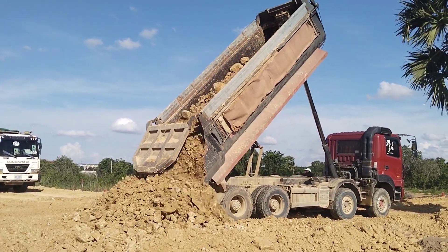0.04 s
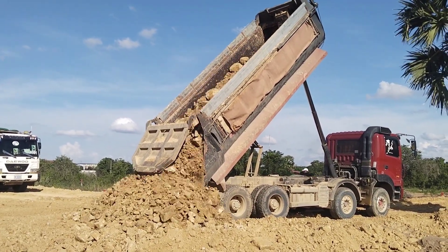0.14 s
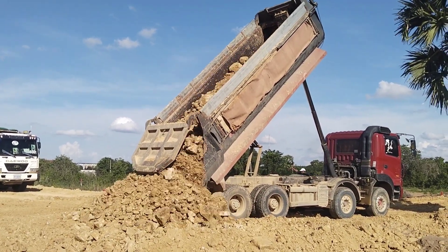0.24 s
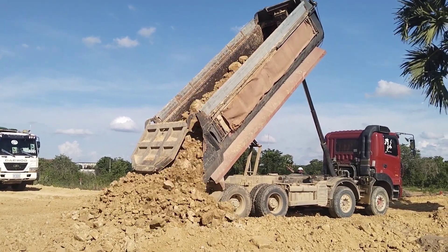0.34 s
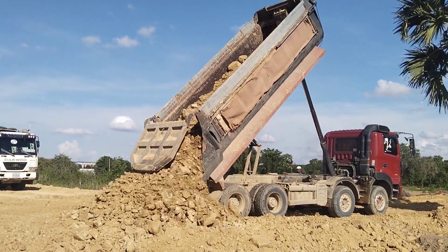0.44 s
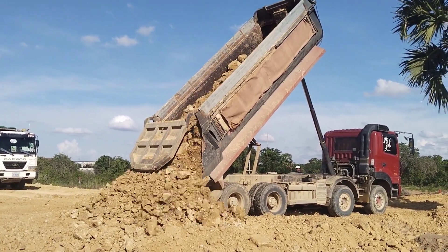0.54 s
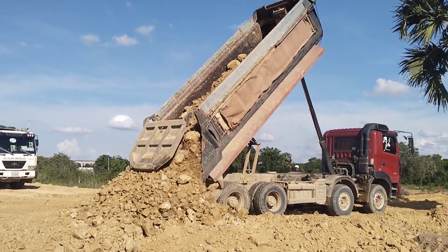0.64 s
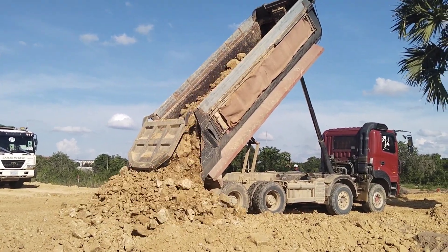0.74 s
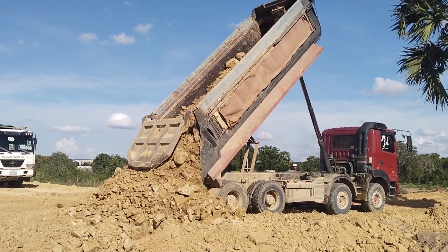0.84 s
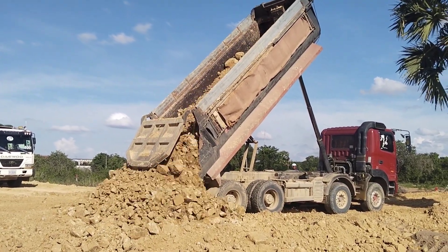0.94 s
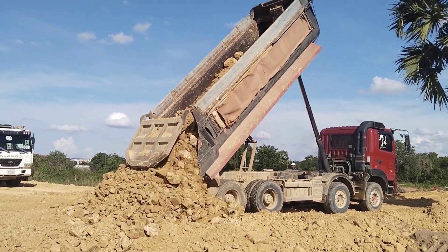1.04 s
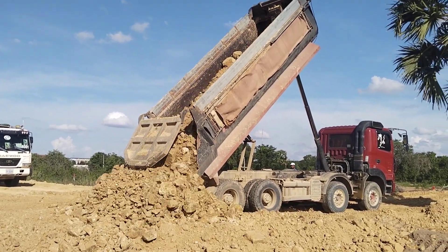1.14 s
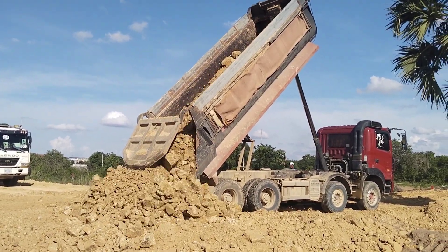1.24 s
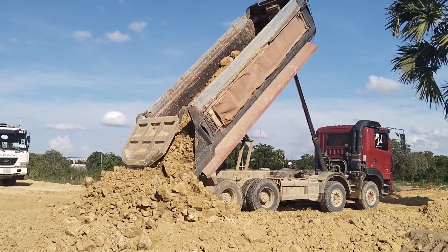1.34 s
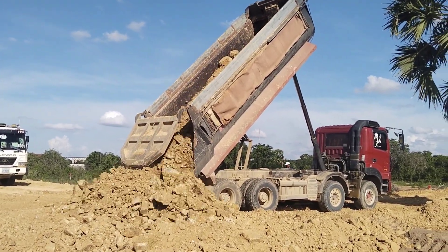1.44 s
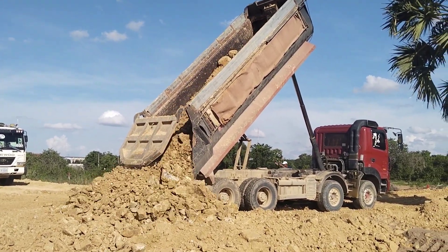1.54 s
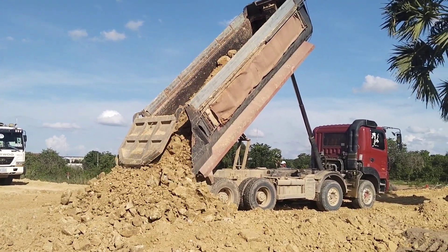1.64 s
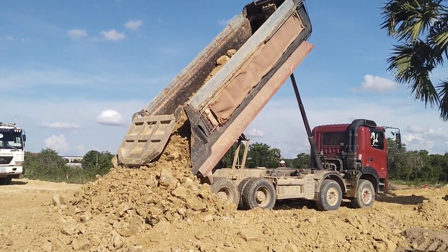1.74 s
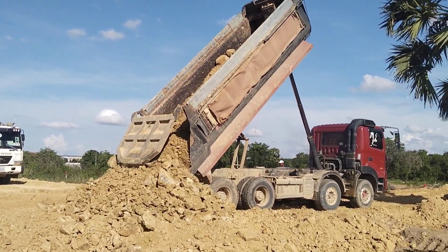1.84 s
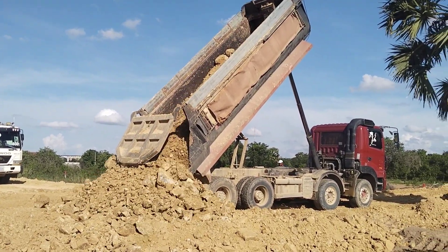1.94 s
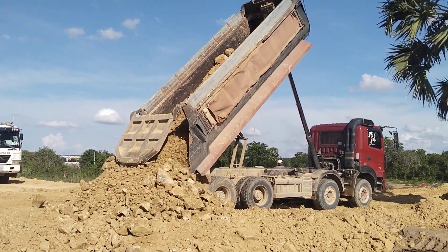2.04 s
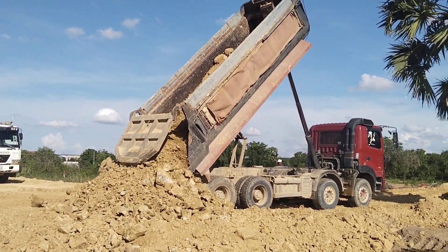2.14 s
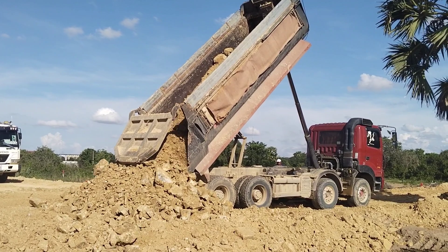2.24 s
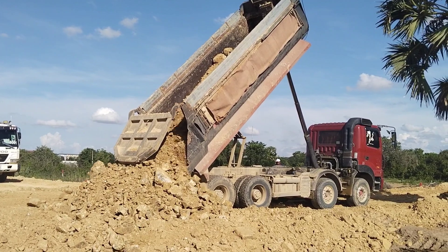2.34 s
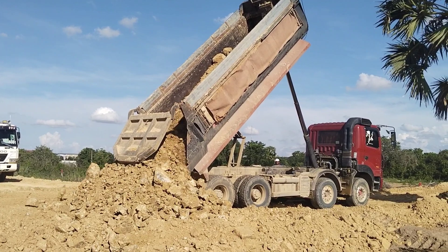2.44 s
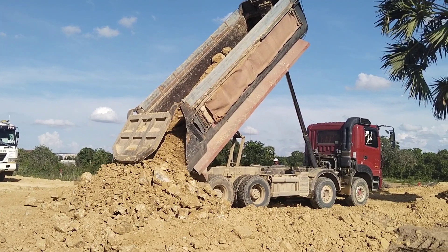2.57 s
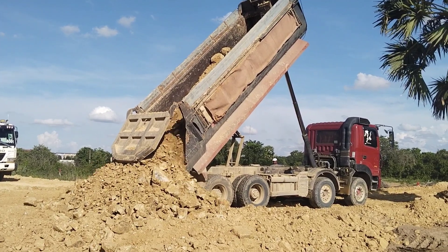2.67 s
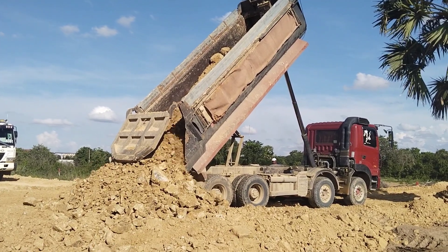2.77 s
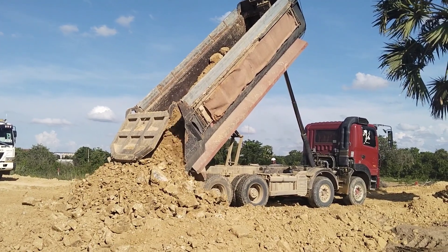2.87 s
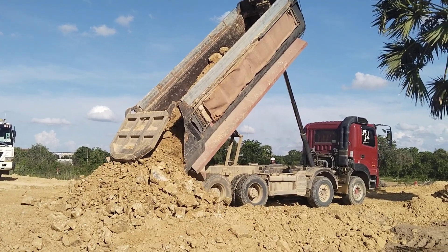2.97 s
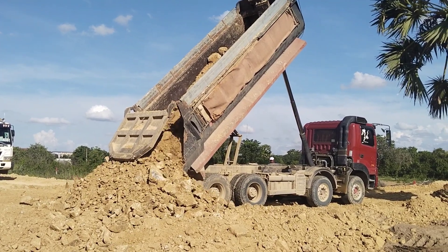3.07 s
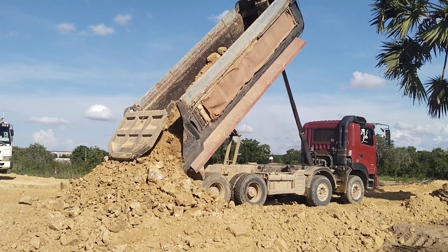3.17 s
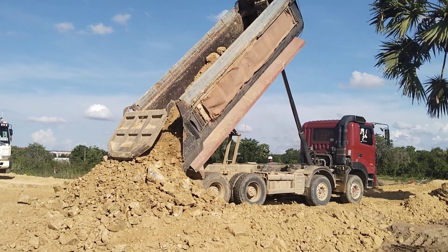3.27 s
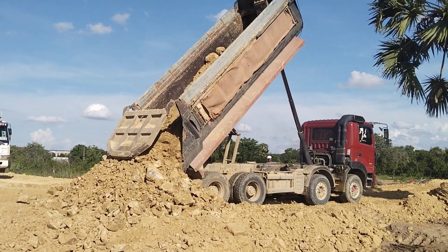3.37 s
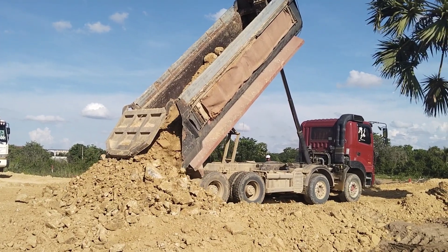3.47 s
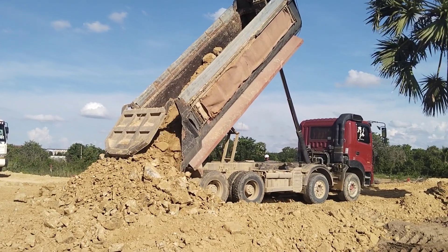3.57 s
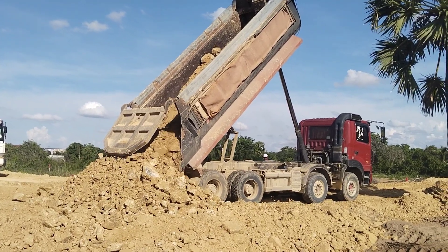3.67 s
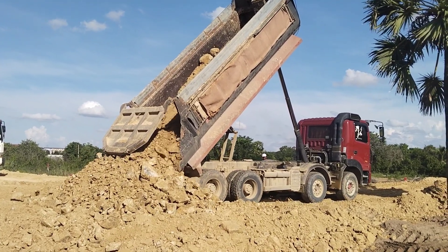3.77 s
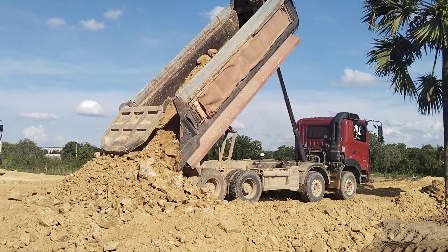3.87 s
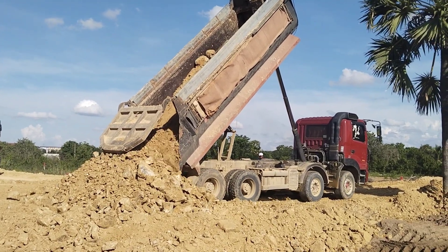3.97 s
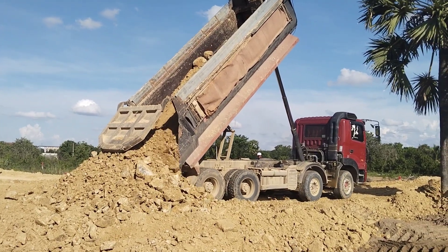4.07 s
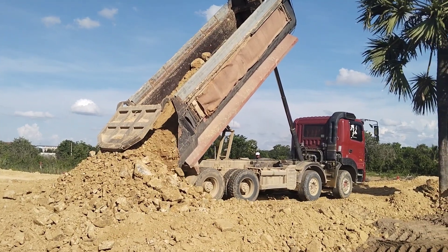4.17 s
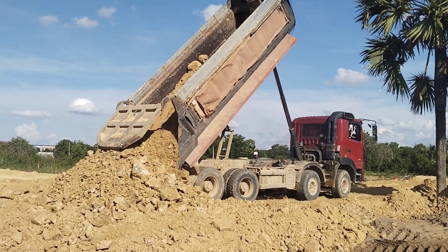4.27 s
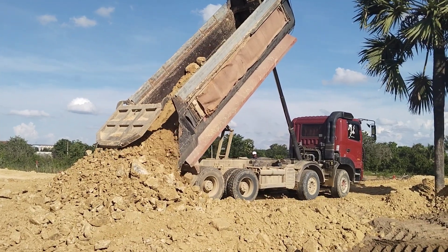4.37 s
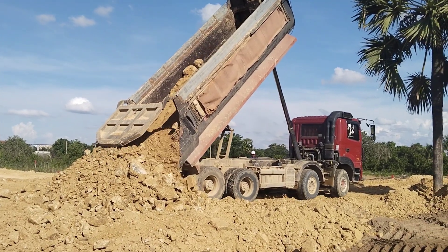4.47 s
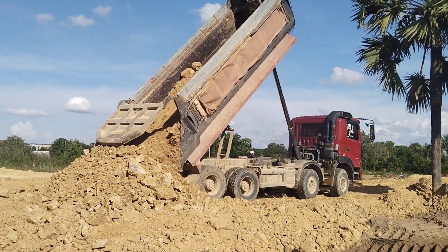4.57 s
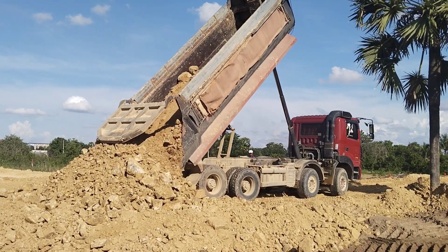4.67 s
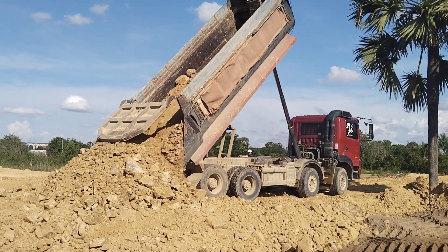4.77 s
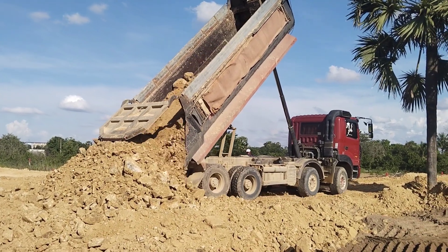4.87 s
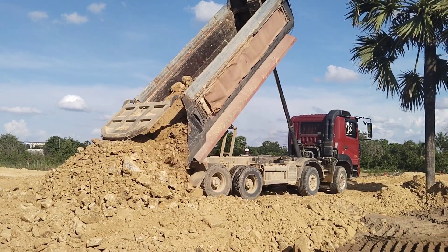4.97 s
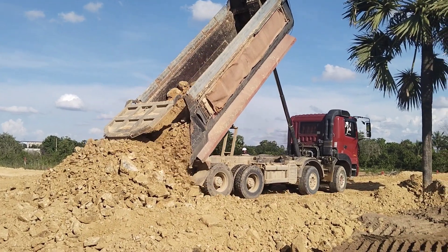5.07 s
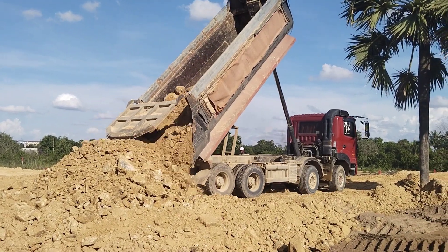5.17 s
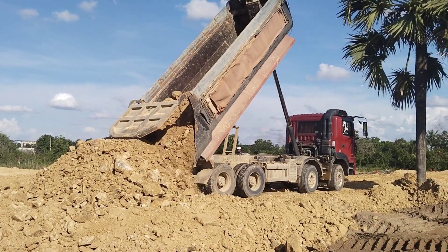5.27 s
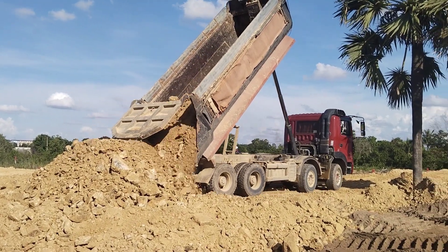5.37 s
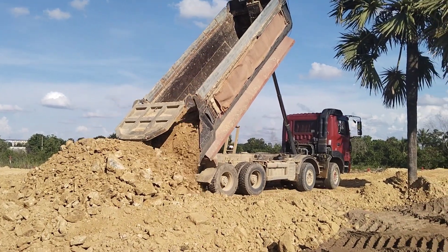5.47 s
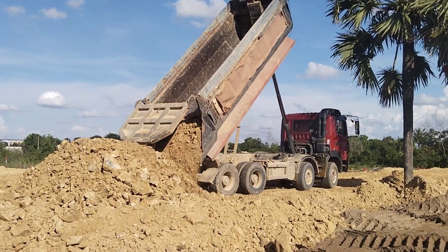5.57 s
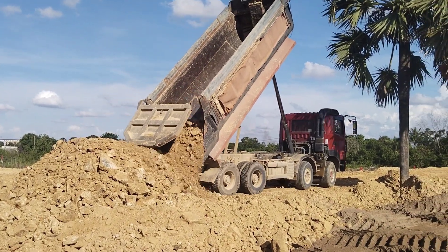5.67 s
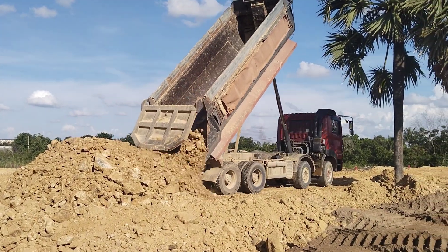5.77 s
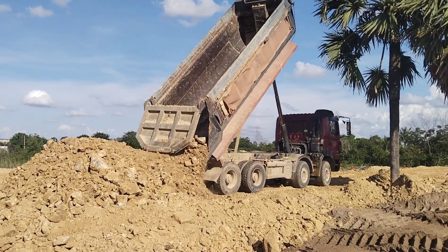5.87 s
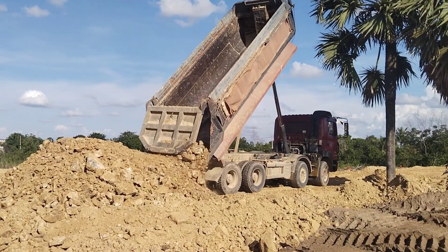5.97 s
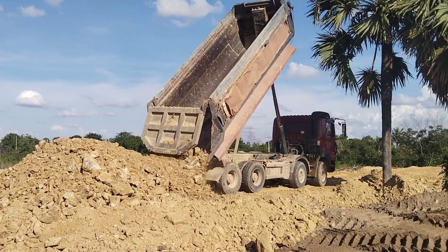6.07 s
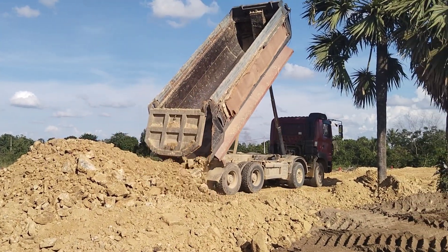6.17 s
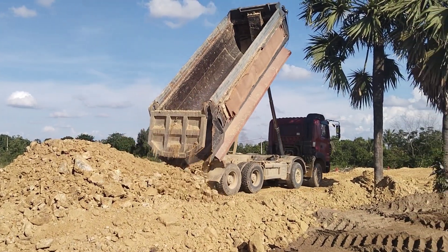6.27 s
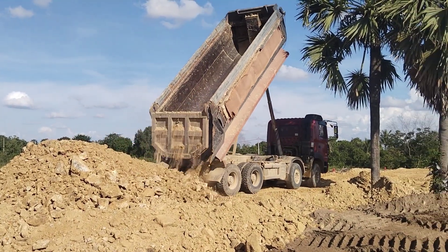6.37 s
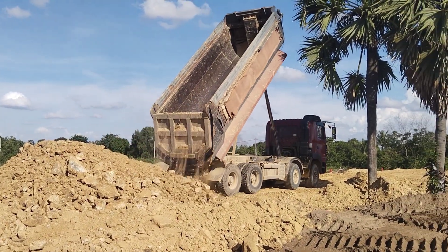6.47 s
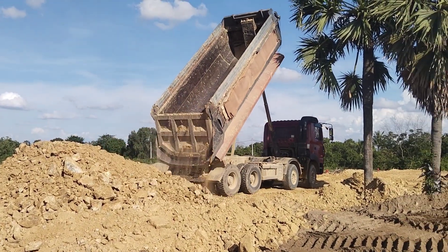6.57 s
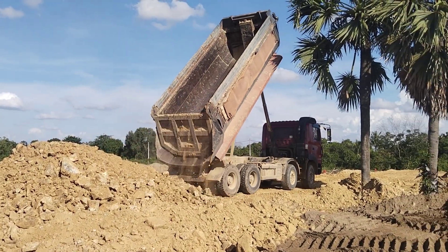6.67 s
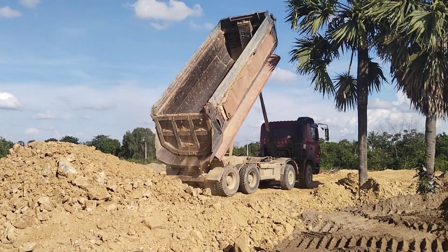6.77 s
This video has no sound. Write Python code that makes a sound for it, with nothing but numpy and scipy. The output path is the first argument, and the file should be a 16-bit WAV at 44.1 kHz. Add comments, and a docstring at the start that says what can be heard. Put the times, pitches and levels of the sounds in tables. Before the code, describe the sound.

A tipper truck empties rocky fill: early dull thuds and clangs, scattered stone clacks, a few thin high metal squeals, a sharp air release with a trailing leak and a smaller puff. The diesel speeds up, gravel and lumps pour down the steel, then the gate bangs loudly several times. Open-air stereo, faint distant site noise behind.

```python
"""Tipper truck dumping stony fill

Heard on an open site, in stereo: lumps thud and clang on the raised steel bed as filtered flurries of contacts,
stones clack on the heap to the left as wavering notes, and filtered noise makes two air-brake blasts and a leak.
The firing pulses of the diesel speed up, then the rest of the load slides out as showers of grains and the
tailgate slams. Thin gliding squeals come and go above it, over a faint bed of distant site noise."""
import sys
import numpy as np
from scipy import signal
from scipy.fft import rfft, irfft, next_fast_len
from scipy.io import wavfile
from scipy.ndimage import map_coordinates

SR = 44100
rng = np.random.default_rng(int(sys.argv[2]) if len(sys.argv) > 2 else 0)


def output_pcm(signal):
    """Save a mono or channel-first signal as 16-bit PCM at the path in sys.argv[1].

    Samples are clipped to [-1, 1] before scaling.
    """
    pcm = np.clip(np.atleast_2d(signal).T, -1, 1) * 32767
    wavfile.write(sys.argv[1], SR, np.round(pcm).astype(np.int16))


N = 300762

T = np.arange(N) / SR  # time [s]
SIZE = next_fast_len(N + SR // 2)  # transform length, with room for tails
HZ = np.maximum(np.arange(SIZE // 2 + 1) * SR / SIZE, 1)  # frequency of each bin [Hz]
TOP_HZ = 15750  # the microphone hears nothing much above this
MID_ONLY = np.array([[1], [0]])  # places a sound in mid, with no side


def undb(db):
    """Decibels to gain."""
    return 10 ** (np.asarray(db) / 20)


def unit(x):
    """Scale to rms 1."""
    return x / np.sqrt(np.mean(x ** 2) + 1e-18)


def curves(rows):
    """Each column of a time table, interpolated sample by sample."""
    s, *columns = np.transpose(rows)
    return [np.interp(T, s, column) for column in columns]


def colour(points):
    """Frequency response through (frequency [Hz], level [dB]) points."""
    hz, db = np.transpose(points)
    return undb(np.interp(np.log(HZ), np.log(hz), db))


def resonances(modes):
    """Frequency response of damped modes of alternating sign."""
    response = 0
    for k, (hz, width, db) in enumerate(modes):
        detuning = (HZ ** 2 - hz ** 2) / (HZ * width)
        response = response + (-1) ** k * undb(db) / (1 + 1j * detuning)
    return response


def peaks(modes):
    """Steep-sided resonances with dark valleys between them."""
    return sum(undb(db) / (1 + ((HZ ** 2 - hz ** 2) / (HZ * width)) ** 2) for hz, width, db in modes)


def band(low_hz, high_hz):
    """Frequency response with steep skirts below and above."""
    return 1 / np.sqrt((1 + (low_hz / HZ) ** 8) * (1 + (HZ / high_hz) ** 8))


def through(x, response):
    """Filter x; white input keeps its power, so only the shape of the response matters."""
    power = np.mean(abs(response) ** 2)
    return irfft(rfft(x, SIZE) * response / np.sqrt(power), SIZE)[..., :N]


def noise():
    """Unrelated white noise for mid and side."""
    return rng.standard_normal((2, N))


def walk(rate):
    """Random drift in straight segments, rate new values a second, spread near 1."""
    return np.interp(T * rate, np.arange(8192), rng.standard_normal(8192))


def grains(rate, scatter_db):
    """Stone contacts of uneven size, rate a second, simultaneous in mid and side but of unrelated sign."""
    spread = np.clip(rng.standard_normal(N), -2, 2)
    sizes = (rng.random(N) < rate / SR) * undb(scatter_db * spread)
    return unit(sizes * np.sign(noise()))


def burst(t, rise, fade, hold=0):
    """Envelope that climbs from t = 0, holds and dies away."""
    return np.clip(t / rise, 0, 1) * np.exp(-np.clip((t - rise - hold) / fade, 0, 20))


def after(s):
    """The half second after s: its samples and their times from zero."""
    span = slice(int(s * SR), int(s * SR) + SR // 2)
    return span, T[:len(T[span])]


def mottle(x, depth_db, rate, per_octave=7):
    """Neighbouring bands of x swell and sink independently, about rate times a second."""
    hz, s, cells = signal.stft(x, SR, nperseg=1024)
    place = np.meshgrid(per_octave * np.log2(1 + hz / 400), s * rate, indexing="ij")
    drift = map_coordinates(rng.standard_normal((192, 256)), place, order=1, mode="mirror")
    return signal.istft(cells * unit(undb(depth_db * drift)), SR)[1][..., :N]


# spectrum of the distant site: (frequency [Hz], relative level [dB])
SITE = [(18, -53), (30, -37), (86, -2.5), (244, 2), (565, -12.5), (929, 1), (1180, -62), (1940, -14),
        (3730, -9.5), (6290, -21), (9570, -15.5), (10600, -21), (12100, -14.5), (13500, -20), (15800, -28)]


def site():
    """Far machines and moving air: noise that gently swells and wanders in colour."""
    swell_db = 1.0 * walk(6)
    air = through(noise() * undb(-55.0 + swell_db), colour(SITE))
    return mottle(mottle(air, 3, rate=14, per_octave=16), 2.5, rate=4, per_octave=5)


# the diesel: (time [s], firing rate [Hz], exhaust level [dB])
DIESEL = [(0, 38.43, -65.5), (3.6, 37.72, -64.5), (4.1, 50.08, -57), (4.5, 55.52, -61), (5.4, 58.16, -72),
          (5.8, 51.7, -38.5), (6.2, 43.87, -52.5), (6.82, 40.2, -40.5)]
# resonances of the engine block: (frequency [Hz], width [Hz], relative level [dB])
BLOCK = [(830, 330, -7.5), (1577, 230, 7.5), (2458, 156, 4.5), (2896, 130, -2), (3150, 150, -6),
         (4210, 140, 0), (4900, 200, -7), (5700, 350, -11), (6380, 420, -10.5)]
IDLE_KNOCK_DB, KNOCK_DB_PER_HZ = -65, 0.9983  # combustion knock grows with speed
KNOCK_FLUTTER_DB = 3.5  # the knock swells and sinks irregularly
# a flare of knock as the throttle opens
THROTTLE_S, THROTTLE_DB, THROTTLE_RISE_S, THROTTLE_FADE_S = 3.54, -48, 0.065, 0.13


def diesel():
    """The cylinders fire in turn: a thump in the exhaust and a knock in the block."""
    hz, exhaust_db = curves(DIESEL)
    flare = undb(THROTTLE_DB) * burst(T - THROTTLE_S, THROTTLE_RISE_S, THROTTLE_FADE_S)
    speed_db = KNOCK_DB_PER_HZ * (hz - hz[0])
    effort = undb(IDLE_KNOCK_DB + speed_db + KNOCK_FLUTTER_DB * walk(17)) + flare
    unsteady_hz = hz * (1 + 0.01005 * walk(10) + 0.0376 * walk(50))
    cycles = np.cumsum(unsteady_hz) / SR
    firing = cycles.astype(int)  # number of the current firing
    # alternate firings are stronger and weaker, and each differs a little
    strength = undb((-1) ** firing + rng.standard_normal(firing[-1] + 1)[firing])
    pulses = unit(np.diff(firing, prepend=0) * strength)
    knock = unit(noise() * strength * (np.exp(-(cycles % 1) / .5) + 0.39))
    pipe = resonances([(73.0, 14.0, 2.5), (151, 36, -2.5), (288, 44, -6.5), (425.3, 13.7, 3.5)])
    exhaust = through(pulses * undb(exhaust_db), pipe * band(80, 690))
    clatter = mottle(through(knock * effort, peaks(BLOCK)), 5, rate=13, per_octave=12)
    return exhaust * MID_ONLY + clatter


# the main pour, before its gains below: (time [s], rumble level [dB], gravel hiss level [dB])
SLIDE = [(4.35, -72, -63.5), (4.59, -65, -54), (4.76, -36.5, -49.5), (5.0, -39, -46.5), (5.32, -33, -44.5),
         (5.51, -36, -50), (5.85, -34.5, -54.5), (6.04, -43.5, -59), (6.28, -48.5, -60),
         (6.421, -44.5, -79)]
POUR_RUMBLE_DB, POUR_HISS_DB, POUR_FADE_S = -1.5, 9.5, 0.29  # gains; the pour starts and stops this softly
DRIBBLE_DB, DRIBBLE_HISS_DB = -64, -62  # stones dribble off the bed all the time
SPILL_DB, SPILL_HOLD_S, SPILL_FADE_S = -50, 0.34, 0.53  # an opening spill dies away
SHAKE_DB, SHAKE_RISE_S, SHAKE_FADE_S = -32.5, 0.1, 0.37  # the slam shakes the last stones in the bed


def flow():
    """Strength of rumble and hiss: both dribble and pour; the opening spill and the slam's shake only rumble."""
    rumble_db, hiss_db = curves(SLIDE)
    outside = abs(T - np.clip(T, SLIDE[0][0], SLIDE[-1][0]))  # seconds before or after the pour
    pour = np.exp(-outside / POUR_FADE_S)
    spill = undb(SPILL_DB) * np.exp(-np.maximum(T - SPILL_HOLD_S, 0) / SPILL_FADE_S)
    shake = undb(SHAKE_DB) * burst(T - SLAMS[0][0], SHAKE_RISE_S, SHAKE_FADE_S)
    moving = spill + pour * undb(rumble_db + POUR_RUMBLE_DB) + shake
    rumble = np.hypot(undb(DRIBBLE_DB), moving)
    hiss = np.hypot(undb(DRIBBLE_HISS_DB), pour * undb(hiss_db + POUR_HISS_DB))
    return rumble, hiss


# spectra of coarse stones, of fines, and of air leaking (also used for dust): (frequency [Hz], relative level [dB])
RUMBLE = [(29, -54), (50, -72), (69, -16.5), (141, 3.5), (190, 1.5), (319, 4), (386, -4.5), (425, 0.5),
          (514, -8.5), (631, 1), (733, -2), (796, -2.5), (963, -2.5), (1130, -18), (1300, -11), (1690, -64),
          (2860, -120)]
GRAVEL = [(530, -10.5), (900, -6.5), (1150, -1.5), (1680, -0.5), (1950, -9), (2200, -7), (2510, -6.5),
          (2790, -18), (3400, -31), (4210, -16), (4570, -24), (5320, -15.5), (6060, -30), (7850, -24),
          (9820, -34), (15000, -32)]
LEAK = [(1180, -48), (2000, -33), (2220, -30), (2480, 7), (3540, 6), (4460, -31), (5260, 4), (6150, -8),
        (6530, -4), (9880, -8), (10800, -9.5), (13400, -9), (15800, -18)]
# pebbles rattling on bare steel: (frequency [Hz], width [Hz], relative level [dB])
RATTLE = [(730, 200, 9), (940, 620, 2), (1707, 170, 7), (2455, 230, -0.5), (4250, 140, -9.5)]
DUST_DB = -20  # finest dust against the hiss strength


def slide():
    """Coarse stones rumble down the steel, pebbles rattle on it and the fines and dust hiss over it."""
    rumble, hiss = flow()
    coarse = mottle(grains(700, scatter_db=3.5) * rumble, 4.5, rate=20)
    pebbles = grains(600, scatter_db=4) * hiss * undb(1.5 * walk(30) + 1.2 * walk(10))
    fines = grains(4000, scatter_db=2) * hiss
    dust = through(noise() * hiss * undb(DUST_DB), colour(LEAK))
    rattle = undb(-4.5) * through(pebbles, peaks(RATTLE))
    gravel = rattle + undb(-2.5) * through(fines, colour(GRAVEL))
    clumps = mottle(gravel, 3.2, rate=26, per_octave=14)
    return through(coarse, colour(RUMBLE)) + clumps + dust


CLOD_DB, CLOD_RING_S = -7.5, 0.0096  # smallest clod against the flow's rumble; fade of its note


def clods():
    """Small clods tumble at random in the flow, each knocking one short note out of the bed."""
    out, (rumble, _) = np.zeros(N), flow()
    for when, size, pitch in rng.random((110, 3)):
        span, t = after(when * T[-1])
        hz = 180 * 2 ** (2.3 * pitch)
        force = rumble[span.start] * undb(CLOD_DB + 11.0 * size)
        out[span] += force * burst(t, 0.0023, CLOD_RING_S) * np.sin(2 * np.pi * hz * t)
    return out * MID_ONLY


# the loudest stones landing on the heap: (time [s], level [dB], pitch [Hz], fade [s])
CLACKS = [(0.128, -46, 1033, 0.021), (.165, -43, 817, 0.033), (.405, -43, 883, 0.011),
          (.555, -51, 950, .015), (.715, -41, 910, 0.012), (1.113, -42, 902, 0.0071),
          (1.366, -42.5, 1002, 0.019), (1.405, -42, 872, 0.018), (1.795, -49, 1000, 0.023),
          (1.944, -50, 960, 0.035), (2.078, -43.5, 960, .025), (2.112, -44, 915, 0.025),
          (2.29, -56, 1010, 0.065), (2.357, -43, 940, 0.018), (2.383, -42, 1020, 0.011),
          (2.443, -37.5, 845, .018), (2.505, -54, 923, 0.0076), (2.574, -42, 915, 0.017),
          (2.695, -39, 925, 0.034), (2.766, -39.5, 960, .02), (2.85, -51.5, 870, 0.056),
          (2.93, -56, 1090, 0.051), (2.992, -45, 755, 0.0096), (3.125, -51, 930, 0.016),
          (3.672, -44, 1012, 0.029), (3.74, -48.5, 687, 0.03), (4.115, -48, 984, 0.02),
          (4.28, -49, 716, 0.02), (4.37, -53, 860, 0.019), (6.357, -36, 913, .02), (6.398, -36, 872, 0.011),
          (6.423, -35, 885, 0.025)]
CLACK_RISE_S, CLACK_WAVER_HZ = 0.0051, 21.2  # the note builds and wavers as the stone rolls
SKITTER_DB = -9.5  # loose contacts against the note
HEAP_LEFT = 0.14  # the heap lies to the left: its side signal as a share of mid


def heap():
    """Stones knock with one hollow, wavering note and skitter on; smaller ones trickle between them."""
    out, waver = np.zeros((2, N)), CLACK_WAVER_HZ * walk(90)
    skitter = through(grains(1300, scatter_db=-0.5), peaks([(894, 370, 0)]))
    for s, db, hz, fade in CLACKS:
        span, t = after(s)
        force = undb(db) * burst(t, CLACK_RISE_S, fade)
        out[0, span] += force * np.sin(2 * np.pi * np.cumsum(hz + waver[span]) / SR)
        out[:, span] += force * undb(SKITTER_DB) * skitter[:, span]
    small = through(grains(160, scatter_db=5.0), peaks([(970, 330, 0)]))
    trickle = mottle(small, 5, rate=16, per_octave=12)
    mid, side = out + undb(-61.0) * trickle
    return np.array([mid, side + HEAP_LEFT * mid])


CLANG_FROM_HZ = 512  # the steel booms below this and clangs above


def blows(rows, contacts, body, crack, note_db):
    """Each blow is a flurry of contacts: the body booms and clangs, the edge cracks, the panel sounds a note."""
    push, strike, edge, notes = np.zeros((4, N))  # the first three gather power
    for s, db, rise, fade, clang_db, crack_db, note_hz in rows:
        span, t = after(s)
        force = undb(db) * burst(t, rise, fade)
        push[span] += force ** 2
        strike[span] += (force * undb(clang_db)) ** 2
        edge[span] += (force * undb(crack_db)) ** 2
        notes[span] += force * undb(note_db) * np.sqrt(2) * np.sin(2 * np.pi * note_hz * t)
    boom = through(contacts * np.sqrt(push), body * band(1, CLANG_FROM_HZ))
    clang = through(contacts * np.sqrt(strike), body * band(CLANG_FROM_HZ, TOP_HZ))
    cracks = through(contacts * np.sqrt(edge), colour(crack))
    return boom + clang + cracks + notes * MID_ONLY


# lumps hitting the bed: (time [s], level [dB], fade [s], panel note [Hz], clang against boom [dB])
LUMPS = [(0.031, -46, 0.12, 405, -25), (.066, -32.5, 0.0082, 337, -39), (.209, -29.5, 0.01, 837, 1.5),
         (.224, -26.5, 0.016, 805, 2.5), (.255, -27, 0.0066, 615, -7.5), (0.268, -28.5, 0.027, 137, -5),
         (.286, -33.5, 0.031, 710, -1), (.32, -33.5, 0.024, 208, -16), (.478, -47.5, 0.049, 790, 8.5),
         (0.502, -46.5, .02, 363, 1), (0.588, -37, 0.031, 360, -24), (.62, -35.5, 0.032, 383.4, -5.5),
         (1.145, -52.5, 0.034, 702, 1), (1.199, -36, 0.022, 432, -5.5), (1.27, -43.5, 0.026, 350, -33),
         (1.333, -52, 0.054, 345, -26), (1.441, -49.5, 0.027, 367, -14), (1.477, -43.5, 0.035, 402, -20),
         (2.991, -50.5, 0.032, 294, -8), (3.21, -52.5, 0.032, 253, -29), (4.22, -53, 0.07, 330, -6),
         (4.451, -53, 0.079, 292, -9), (4.618, -29, 0.034, 306, -2), (4.641, -29.5, 0.045, 268.5, 2.5),
         (4.694, -38.5, 0.047, 127, -16), (5.07, -44, 0.033, 264, -24), (5.173, -44, 0.028, 680, -2),
         (5.27, -38, 0.012, 637, -6), (5.391, -38.5, 0.11, 350, -4.5), (5.646, -40, 0.035, 703, -4),
         (5.7, -39.5, 0.19, 720, 4), (5.745, -35, 0.072, 308, -2), (5.781, -26.5, 0.047, 319, -7),
         (5.825, -27.5, 0.045, 193, -9), (5.93, -40.5, 0.051, 120, -4), (6.005, -42.5, 0.033, 141, -14),
         (6.241, -42.5, 0.18, 149, -31), (6.281, -41.5, 0.086, 307, -3)]
# resonances of the loaded steel bed: (frequency [Hz], width [Hz], relative level [dB])
BED = [(156, 190, -3), (303, 41, 5.5), (390, 108, 1), (670, 112, 3.5), (823, 140, -4), (1414, 280, -9.5)]
# spectrum of a lump's crack: (frequency [Hz], relative level [dB])
CRACK = [(560, -14), (950, -11), (1350, -24), (1610, -1.5), (1890, -23.5), (2390, -7), (3050, -5),
         (3360, -20.5), (4020, -11), (5080, -15.5), (5530, -16), (6150, -27), (9600, -33), (11400, -46),
         (12000, -43), (15600, -64), (22000, -120)]
NOTE_DB = -1  # panel note against the boom
HEAVY_DB = -23  # level of a heavy lump, for which the next settings hold
RISE_S, RISE_PER_DB = 0.022, 0.12  # it crushes this long, lighter ones less (exponent per dB)
CRACK_DB, CRACK_SLOPE = -4.5, 0.88  # its crack against its clang; dB more crack per dB of blow


def lumps():
    """Lumps hit the damped, loaded bed: earth thuds, rock clangs; heavier ones crush longer and crack harder."""
    rows = []
    for s, db, fade, hz, clang_db in LUMPS:
        weight_db = db - HEAVY_DB
        rise = RISE_S * np.exp(RISE_PER_DB * weight_db)
        crack_db = clang_db + CRACK_DB + CRACK_SLOPE * weight_db
        rows.append((s, db, rise, fade, clang_db, crack_db, hz))
    return blows(rows, grains(3000, scatter_db=2.0), peaks(BED), CRACK, NOTE_DB)


# squeals: (time [s], length [s], level [dB], middle pitch [Hz], glide [octaves],
# bend of the ends [octaves], roughness [0-1], octave overtone against the note [dB])
SQUEALS = [(0.568, 0.1, -50, 4780, 0.091, 0.0039, 0.1, -11),
           (0.855, 0.093, -44.5, 4540, -0.14, .04, 0.1, -28),
           (1.805, 0.028, -43, 4970, -0.055, 0.0059, 0.23, -28),
           (4.981, 0.041, -36, 5217, -0.02, -0.036, 0.07, -37),
           (5.475, 0.03, -43.5, 4760, .03, 0.0045, 0.1, -30),
           (5.616, 0.072, -61, 5090, 0.024, -0.0051, .05, -30),
           (5.653, 0.074, -44, 4944, -0.0025, 0.016, 0.18, -36),
           (6.101, 0.047, -43.5, 2500, 0.41, -0.0089, 0.5, -25),
           (6.133, 0.063, -48, 2835, -0.005, -0.052, 0.67, -11.5),
           (6.198, 0.09, -44.5, 4760, -0.16, 0.0091, 0.18, -37),
           (6.283, 0.127, -52.5, 11050, 0.051, 0, 0.1, -38),
           (6.663, 0.094, -38, 5217, -0.049, -0.025, 0.06, -28)]
SQUEAL_WAVER = 0.12  # pitch spread of a fully rough squeal, as a share of its pitch
SQUEAL_PEAK_SHARE = 0.39  # a squeal is loudest this far through its length
SQUEAL_ECHO_DB, SQUEAL_ECHO_S = -9, 0.019  # scattered echoes that blur each squeal


def squeals():
    """Short curved glides with a faint octave, blurred by echoes; the rough ones waver more in pitch."""
    out, waver = np.zeros(N), SQUEAL_WAVER * walk(920)
    for s, length, db, middle_hz, glide, bend, rough, octave_db in SQUEALS:
        span = (T > s) & (T < s + length)
        u = (T[span] - s) / length  # 0 to 1 through the squeal
        octaves = glide * (u - .5) + bend * (2 * u - 1) ** 2
        hz = middle_hz * 2 ** octaves * (1 + rough * waver[span])
        swell = np.sin(np.pi * np.interp(u, [0, SQUEAL_PEAK_SHARE, 1], [0, .5, 1])) ** 2
        phase = 2 * np.pi * np.cumsum(hz) / SR
        tone = np.sin(phase) + undb(octave_db) * np.sin(2 * phase)
        out[span] += undb(db) * np.sqrt(2) * swell * tone
    echoes = through(out, rfft(noise() * np.exp(-T / SQUEAL_ECHO_S), SIZE))
    return out * np.array([[1], [.3]]) + undb(SQUEAL_ECHO_DB) * echoes


# air valves: (time [s], level [dB], rise [s], hold [s], fade [s],
# port whistle against the jet [dB], chuff [Hz], chuff against the jet [dB])
VENTS = [(1.413, -32.5, 0.021, 0.042, 0.1, 0, 1650, -12.5),
         (3.274, -41.5, 0.01, 0.029, 0.041, -29, 1745, 0.5)]
# spectrum of the blast: (frequency [Hz], relative level [dB])
AIR = [(820, -56), (1400, -17), (1650, -11), (2040, -8), (2160, -18), (2300, -4), (2570, -1.5), (2960, 0),
       (4180, -7.5), (4960, -5), (7990, -12), (9880, -8.5), (10600, -11), (12600, -12), (15800, -10.5)]
# resonances of the valve port, then of the bleeding air line: (frequency [Hz], width [Hz], relative level [dB])
PORT = [(2860, 22, -3), (2906, 150, -3.5), (2980, 27, -23), (3094, 100, -4), (3220, 25, -11),
        (3360, 160, -9), (3720, 110, -11.5), (5210, 120, -10.5), (9900, 90, -10)]
LINE = [(2360, 200, 2), (2820, 190, -3.5), (3170, 290, 6), (3640, 180, 3), (4350, 140, -37), (5380, 130, 0),
        (6100, 260, 6), (7080, 240, 3), (8000, 330, -12), (8980, 380, 0.5), (10100, 260, 0)]
LINE_DB = -1  # the line's resonances against its plain hiss
# the air line bleeds from the first blast on
LEAK_DB, LEAK_RISE_S, LEAK_HOLD_S, LEAK_FADE_S = -59, 0.067, 1.5, 0.93


def air_brakes():
    """Two blasts of air chuff and whistle in the valve ports; the line bleeds on through unsteady resonances."""
    jet, whistle, chuffs = 0, 0, 0
    for s, db, rise, hold, fade, whistle_db, chuff_hz, chuff_db in VENTS:
        puff = undb(db) * burst(T - s, rise, fade, hold)
        jet = jet + puff
        whistle = whistle + puff * undb(whistle_db) * burst(T - s, rise, 0.23, hold)
        chuff_modes = [(chuff_hz, 220, 0), (850, 900, -11)]
        chuffs = chuffs + through(noise() * puff * undb(chuff_db), peaks(chuff_modes))
    turbulence = undb(1.0 * walk(70))
    sputter_db = 1.6 * walk(45) + 1.0 * walk(20)
    leak_shape = burst(T - VENTS[0][0], LEAK_RISE_S, LEAK_FADE_S, LEAK_HOLD_S)
    leak = undb(LEAK_DB + sputter_db) * leak_shape
    hiss = through(noise() * jet * turbulence, colour(AIR))
    blast = mottle(hiss + through(noise() * whistle, peaks(PORT)), 3.2, rate=24, per_octave=26)
    plain = through(noise() * leak, colour(LEAK))
    ringing = through(noise() * leak * undb(LINE_DB), peaks(LINE))
    bleed = mottle(plain + ringing, 5, rate=13, per_octave=24)
    return blast + chuffs + bleed


# tailgate slam and rebounds: (time [s], level [dB], panel note [Hz])
SLAMS = [(6.508, -16, 147.8), (6.546, -17, 627), (6.584, -17.5, 203), (6.64, -23, 323), (6.676, -28, 253),
         (6.788, -37, 790)]
# resonances of the empty bed and tailgate: (frequency [Hz], width [Hz], relative level [dB])
GATE = [(139, 23, -1.5), (202, 39, -1.5), (249.5, 17, 4), (331, 41, 6.5), (384, 106, -0.5), (482, 8.5, -11),
        (586, 12, -7), (628, 15, 2), (684, 73, 0), (766, 3.7, 5), (796, 250, -2), (920, 6.9, 4),
        (946, 61, -9), (1100, 6.9, -20)]
# spectrum of bare steel cracking on steel: (frequency [Hz], relative level [dB])
GATE_CRACK = [(560, -5.5), (950, -4.5), (1350, -11), (1610, 1.5), (1890, -13), (2400, -7.5), (3050, -11.5),
              (3400, -15), (4100, -12.5), (5500, -11.5), (6300, -17), (8000, -24.5), (9600, -27),
              (12000, -44), (15600, -60), (22000, -120)]
SLAM_RISE_S, SLAM_FADE_S = 0.014, 0.054
SLAM_NOTE_DB, SLAM_CLANG_DB = -7, -9  # panel note and upper modes against the boom
SLAM_CRACK_DB, REBOUND_DULLS_DB = -10.5, 7.5  # crack of the first contact; each rebound is duller by this much


def tailgate():
    """The gate chatters on the empty bed, whose panels ring freely; steel cracks brightly, each rebound duller."""
    rows = []
    for k, (s, db, hz) in enumerate(SLAMS):
        crack_db = SLAM_CRACK_DB - k * REBOUND_DULLS_DB
        rows.append((s, db, SLAM_RISE_S, SLAM_FADE_S, SLAM_CLANG_DB, crack_db, hz))
    body = resonances(GATE) * band(75, 3600)
    return blows(rows, grains(7000, scatter_db=1.5), body, GATE_CRACK, SLAM_NOTE_DB)


def reflections(x, wet_db, fade):
    """Chassis, bed and ground return a quick spray of echoes that ripples the treble."""
    spray = rng.standard_normal((2, SR // 8)) * np.exp(-T[:SR // 8] / fade)
    spray /= np.sqrt(np.sum(spray[0] ** 2))
    echoes = undb(wet_db) * band(674, 21000)
    response = (1 + echoes * rfft(spray, SIZE)) / np.sqrt(1 + echoes ** 2)
    return irfft(rfft(x, SIZE) * response, SIZE)[:, :N]


# stereo width: (frequency [Hz], gain on the side signal [dB])
WIDTH = [(60, -17.5), (250, -21), (550, -6), (850, -15), (1200, 1.5), (1600, -4), (2200, 5), (3000, -5),
         (4500, 1), (15000, 0)]


def scene():
    """All sources at the stereo microphone: the bass nearly alike on both sides, the treble wide and a little left."""
    opening = site() + diesel() + slide() + clods() + heap() + lumps()
    dry = opening + squeals() + air_brakes() + tailgate()
    mid, side = reflections(dry, wet_db=-5, fade=.012)
    # sound reaches the right slightly earlier; the pouring load lies more nearly straight ahead
    off_axis = np.interp(T, [4.4, 4.7], [1, .3])
    lean = .18 - .85j * np.sin(2 * np.pi * HZ * 0.000393)  # louder on the left, later there
    direct = lean * rfft(mid * off_axis, SIZE)
    side = irfft(colour(WIDTH) * (direct + 0.74 * rfft(side, SIZE)), SIZE)[:N]
    return np.array([mid + side, mid - side])


def record(dry):
    """The microphone sheds the deep bass and cuts the top."""
    thin = signal.sosfilt(signal.butter(4, 58, "high", fs=SR, output="sos"), dry)
    return signal.sosfilt(signal.ellip(10, .2, 80, TOP_HZ, fs=SR, output="sos"), thin)


dry = scene()
out = record(dry)
output_pcm(out)
```